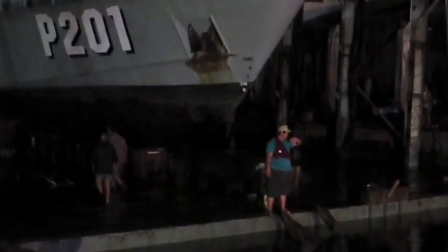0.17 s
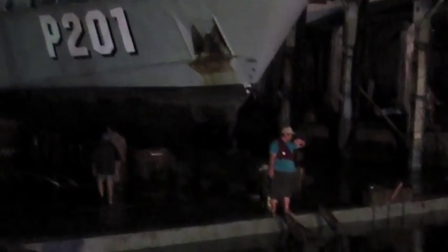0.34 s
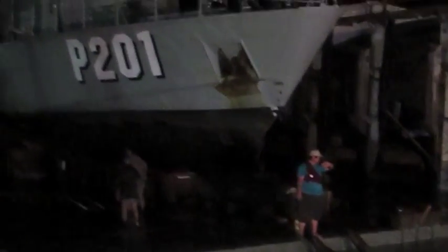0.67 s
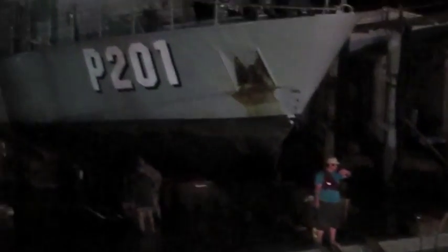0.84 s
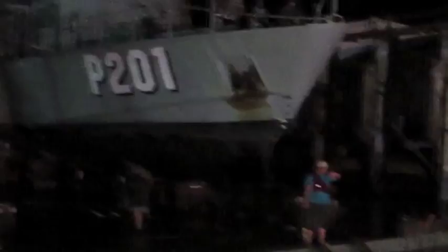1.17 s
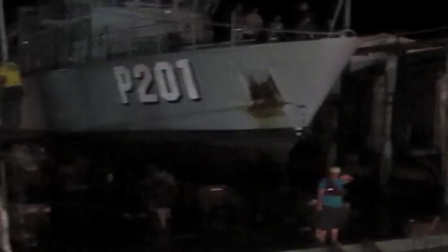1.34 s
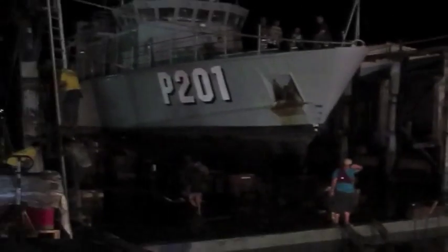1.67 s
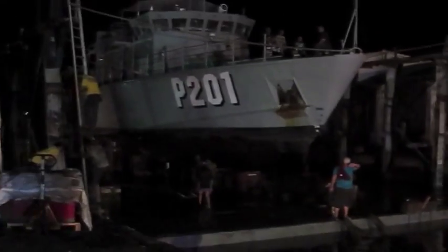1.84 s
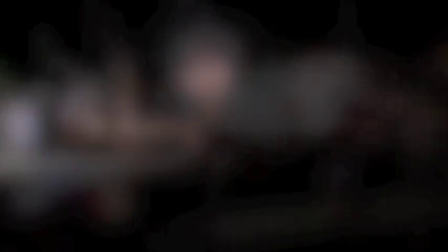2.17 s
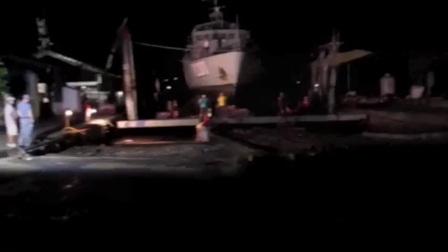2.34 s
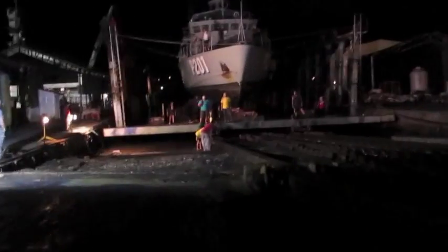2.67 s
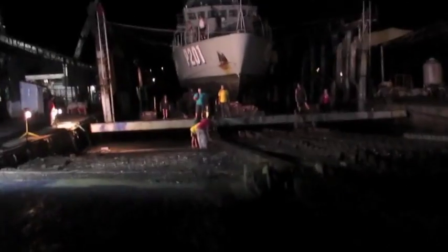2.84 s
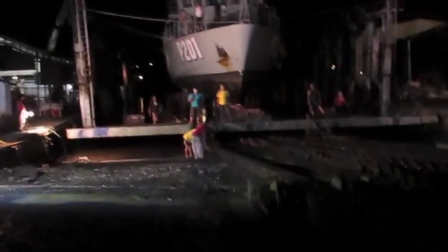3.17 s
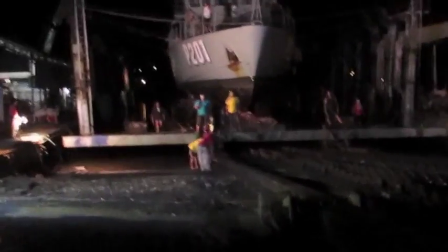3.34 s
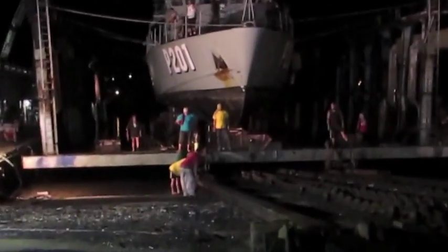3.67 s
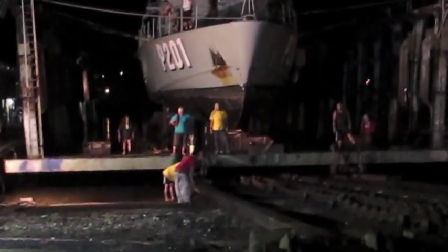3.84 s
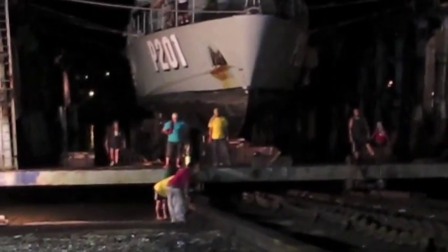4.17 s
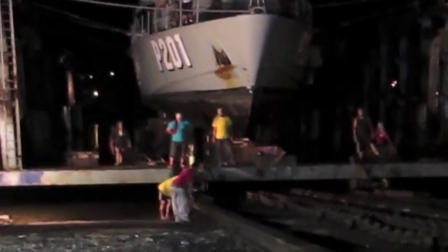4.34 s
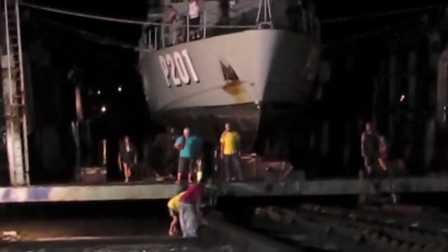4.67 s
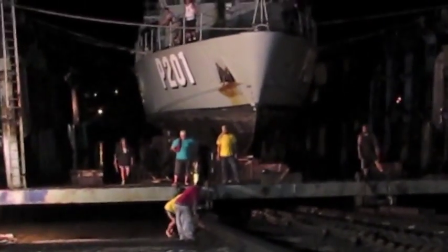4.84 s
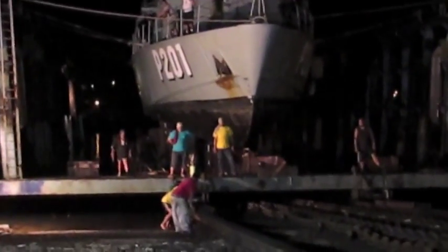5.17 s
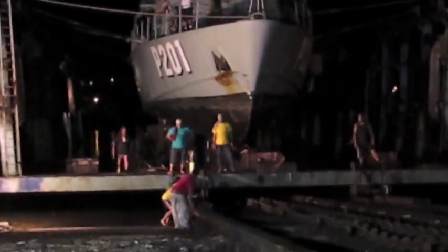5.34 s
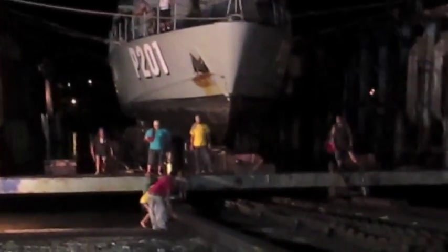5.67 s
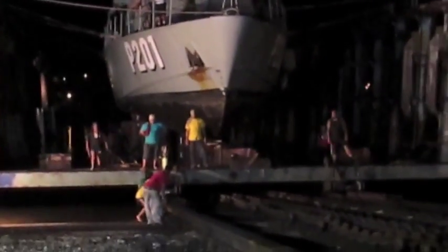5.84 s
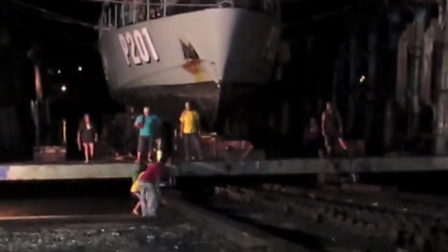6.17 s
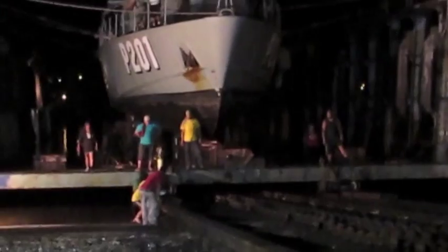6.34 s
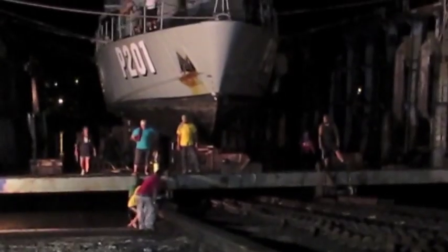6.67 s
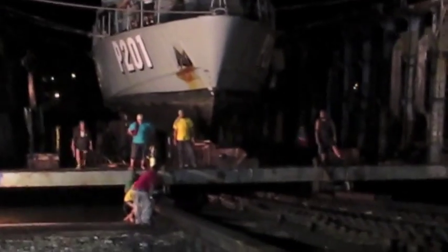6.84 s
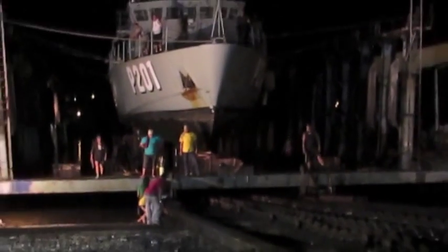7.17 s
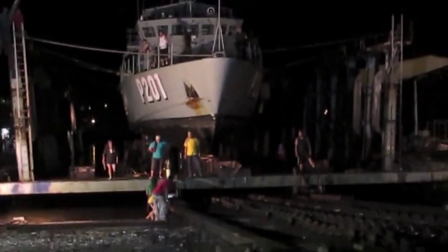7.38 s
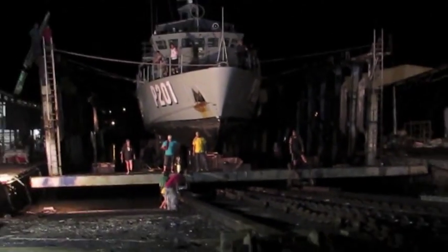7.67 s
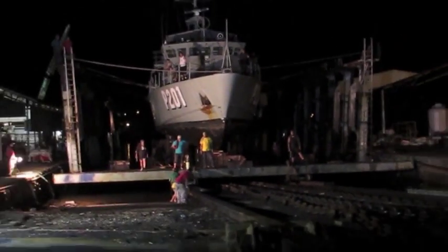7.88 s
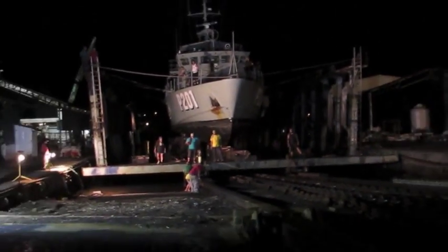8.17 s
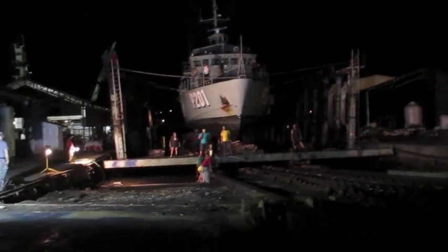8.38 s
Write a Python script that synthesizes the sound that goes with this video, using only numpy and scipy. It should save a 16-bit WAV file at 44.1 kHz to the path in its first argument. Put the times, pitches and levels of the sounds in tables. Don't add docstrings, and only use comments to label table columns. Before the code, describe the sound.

First a distant, windy slipway: low gusts buffeting the microphones, dull yard noise, very faint machine tones and the camera's plastic lever ticking under a finger. The sound dissolves smoothly to a nearby hauling winch, sheltered from wind, whining around a constant pitch above a throbbing hum and rough low rumble, with a thin hiss. One bright, hard click lands early in the close part; the whine gently swells and eases.

```python
import sys
import numpy as np
from scipy import signal
from scipy.fft import rfft, irfft, next_fast_len
from scipy.io import wavfile

SR = 44100
rng = np.random.default_rng(int(sys.argv[2]) if len(sys.argv) > 2 else 0)


def digitize_waveform(pressure):
    field = np.atleast_2d(pressure).T
    bounded = np.clip(field, -1, 1)
    quanta = np.round(bounded * 32767).astype(np.int16)
    wavfile.write(sys.argv[1], SR, quanta)


def voltage_ratio(level):
    return 10 ** (np.asarray(level, float) / 20)


N = 375291
T = np.arange(N) / SR

SHAFT_HZ = 29.905
WHINE_ORDER = 18
DISSOLVE_S, DISSOLVE_LENGTH_S = 2.013, 0.52
RUMBLE_DB, RUSH_DB, FAR_WHINE_DB = -18, -36, -45

# (frequency [Hz], likeness [0-1], left over right [dB], right leads [radians])
PORT_DIFFERENCE = [(60, .9965, 0, .01), (150, .996, 0, .03), (320, .978, -.1, .05), (500, .975, -.5, .08),
                   (1000, .93, -.5, .15), (2100, .78, .3, .3), (2650, .25, 2.2, 1.1), (3100, .5, 3, .8),
                   (3700, .25, 3, 1.3), (5600, .42, 3, 3), (6800, .38, -.3, 4.3), (8000, .3, -8, 5.2),
                   (9000, .25, -14, 4.8), (10500, .15, -13, 4.3), (12000, .06, -10, 4.5),
                   (15000, .04, -10, 4.5)]
# (time [s], level [dB])
YARD_LEVEL = [(0, -29), (.26, -26), (.34, -31.5), (.9, -34.5), (1.05, -33.5), (1.5, -33.5), (1.72, -34.5),
              (1.9, -35.5), (2.1, -33)]
# (frequency [Hz], level [dB per Hz])
YARD_COLOUR = [(150, -9.5), (300, 3), (600, -5.5), (1000, -10.5), (1800, -13), (2500, -20.5), (4000, -25),
               (6000, -25), (8500, -37.5), (10000, -45.5), (13000, -59), (16000, -66)]
# (left port [dB], right port [dB])
BREEZE_DB = (-20, -25.5)
# (time [s], half length [s], left level [dB], right level [dB])
GUSTS = [
    (0.017, 0.069, -47, -28),
    (0.29, 0.081, -19, -31),
    (.66, 0.13, -27, -36),
    (.9, 0.044, -44, -31),
    (1.494, 0.16, -18.5, -20),
    (1.906, 0.1, -35, -20.5),
]
# (frequency [Hz], level [dB per Hz])
WIND_COLOUR = [(12, -36), (20, -11.5), (102, -0.5), (281, -11.5), (454, -22), (507, -25), (549, -37),
               (595, -33), (900, -46), (1170, -75), (1980, -120)]
# (time [s], peak [dB], frequency [Hz], port [0 left, 1 right])
EDDIES = [(.189, -5, 100, 0), (.227, -1.5, 110, 0), (.284, -5, 129, 0), (.328, -4, 100, 0),
          (.664, 0, 104, 0), (0.742, 0.5, 101, 0), (0.911, -6, 110, 1), (1.0, -4.5, 150, 0),
          (1.361, -4, 250, 0), (1.418, -6, 170, 0), (1.46, -6, 150, 1), (1.51, -9, 110, 1),
          (1.541, -1.5, 120, 0), (1.589, -3, 140, 0), (1.627, -2.5, 150, 0), (1.71, -5.5, 110, 1),
          (1.784, -4, 110, 0), (1.816, -8, 110, 1), (1.83, -4.5, 139, 0), (1.942, -1.2, 150, 1)]
# (frequency [Hz], waver
# [radians], close level [dB], far level [dB])
FRAME_TONES = [(25, .5, -50.5, -68.5), (40.5, .5, -52, -72), (56, .5, -50.5, -73), (81.4, .6, -35, -55),
               (99.5, 0.65, -33, -35.5), (161, 0.88, -37.5, -63), (194, 0.57, -39.5, -48),
               (262.2, 1.46, -35.5, -57), (318.8, 1.03, -35, -55), (422.6, 1.34, -32, -60),
               (468.4, 1.65, -32, -61), (811, 2.6, -42, -71), (870, 1.95, -44, -71), (923, 1.56, -60, -74),
               (8853, 2.5, -67, -87)]
CLOSE_DRIVE_DB = {2: -42, 2.5: -48, 4.5: -43, 5: -43, 6: -33, 10: -42, 14: -38, 15: -40, 16: -39, 19: -39,
                  20: -42, 22: -44, 29: -48, 32: -44, 34: -45, 36: -43, 37: -47, 38: -48, 39: -46, 41: -48,
                  53: -45, 54: -45}
FAR_DRIVE_DB = {19: -52, 21: -53, 34: -60, 46: -60, 54: -53}
# (time [s], level [dB])
GEAR_LOAD = [(2.2, -25), (2.5, -21), (2.9, -20), (3.4, -24), (3.6, -23.5), (4.05, -24.5), (4.3, -21),
             (5.1, -19), (5.9, -20.5), (6.2, -21), (6.5, -18.5), (6.8, -22), (7.55, -22.5), (7.8, -19.6),
             (8.15, -19), (8.51, -19.5)]
# (time [s], half length [s], frequency [Hz], level [dB])
BRIEF_TONES = [
    (.21, .05, 765, -38),
    (0.224, .04, 846, -40),
    (2.46, 0.072, 218.5, -22),
    (3.123, 0.14, 660, -26),
]
# (time [s], peak [dB], extra brightness [dB per two octaves], snap [dB])
TICKS = [
    (.731, -26, -26, -12),
    (.8822, -28, -11, -5),
    (.939, -30, -6, -5),
    (.980, -42, -4, 0),
    (1.0629, -9, -1.5, -10),
    (3.7466, -5, 0, -9),
]
# (time [s], half length [s], level [dB])
RUBS = [
    (.766, .008, -46),
    (0.79, .009, -40),
    (1.038, .014, -37),
]
# (frequency [Hz], level [dB per Hz])
SNAP_COLOUR = [(600, -26), (1000, -8), (2300, 9.5), (3300, 0.5), (6500, -1.5), (9500, -27), (14000, -30),
               (16000, -60)]
# (frequency [Hz], left [dB], right [dB], swell [s])
PRESS_TONES = [(1050, -22, -7, .0007), (1550, -20, -13, .0007), (2350, -7, -16, .001),
               (2780, -13, -3, .0007), (3600, -17, -20, .0006), (4150, -17, -10, .0006),
               (5300, -18, -22, .0006), (6300, -16, -7, .0005), (8150, -26, -1, .0004),
               (9300, -28, -11, .0004), (10800, -35, -20, .0003), (14000, -33, -21, .00015)]
# (frequency [Hz], left [dB], right [dB], swell [s])
RELEASE_TONES = [(1820, -17, -18, 0.00045), (2400, -2, -7.5, 0.00046), (2650, -15, 2.5, .00045),
                 (3710, -10, -31, 0.00099), (4920, -14, 0.5, 0.00037), (5760, -16, -7, 0.00051),
                 (6940, -30, -22, 0.00038), (8660, -38, -14, 0.00069), (9800, -38, -20, .0004),
                 (13200, -51, -22, .00025)]
# (frequency [Hz], level [dB per Hz])
RUMBLE_COLOUR = [(15, -68), (25, -38), (54, -20), (87, -17), (124, -10.5), (182, -6), (352, -9.5),
                 (466, -9.5), (494, -11), (536, -10.5), (629, -13.5), (1640, -21), (3000, -33), (3900, -56),
                 (6600, -120)]
# (frequency [Hz], level [dB per Hz])
RUSH_COLOUR = [(1800, -5.5), (2500, -30), (3200, 2), (4500, 2), (5600, 2.5), (6800, -5), (8200, -9.5),
               (9500, -17), (11000, -23), (13000, -32), (14800, -40.5), (16000, -54)]


def rms_one(x):
    return x / np.sqrt(np.mean(x ** 2) + 1e-20)


def in_time(rows):
    seconds, level = np.transpose(rows)
    return np.interp(T, seconds, level)


def at_hz(points, hz):
    table_hz, *columns = np.transpose(points)
    return [np.interp(np.log(hz + 1), np.log(table_hz), column) for column in columns]


def bump(centre, half):
    return np.exp(-((T - centre) / half) ** 2)


def drift(rate):
    r = np.exp(-80 * np.pi * rate / SR)
    noise = rng.standard_normal(N // 40 + 2002)
    slow = signal.lfilter([1], [1, -2 * r, r * r], noise)[2000:]
    return np.interp(np.arange(N) / 40, np.arange(len(slow)), rms_one(slow))


def shaped(x, colour):
    size = next_fast_len(N)
    hz = np.arange(size // 2 + 1) * SR / size
    gain = voltage_ratio(at_hz(colour, hz)[0])
    return rms_one(irfft(rfft(x, size) * gain, size)[..., :N])


def ports(direct, diffuse):
    size = next_fast_len(N)
    alike, pan_db, lead = at_hz(PORT_DIFFERENCE, np.arange(size // 2 + 1) * SR / size)
    alike = np.clip(alike, 0, 1)
    side = np.array([[.5], [-.5]])
    shared = np.sqrt(alike) * rfft(direct, size) * np.exp(-1j * lead * side)
    own = np.sqrt(1 - alike) * rfft(diffuse, size)
    return irfft((shared + own) * voltage_ratio(pan_db * side), size)[:, :N]


def nearness():
    return np.clip((T - DISSOLVE_S) / DISSOLVE_LENGTH_S, 0, 1)


def throb(depth):
    turn = 2 * np.pi * SHAFT_HZ * T
    return 1 + depth * (np.sin(turn) + 0.71 * np.sin(2 * turn))


def machine_noise(colour, patchy_db, throb_depth):
    flicker = voltage_ratio(patchy_db * (drift(36) + 0.4 * drift(0.63)))
    white = rng.standard_normal((3, N)) * throb(throb_depth) * flicker
    return shaped(ports(white[0], white[1:]), colour)


def yard_noise(far):
    return voltage_ratio(in_time(YARD_LEVEL)) * far * machine_noise(YARD_COLOUR, patchy_db=1.37, throb_depth=.03)


def wind(far):
    lumps = np.array([voltage_ratio(1.34 * drift(27)), voltage_ratio(1.6 * drift(31))])
    strength = voltage_ratio(BREEZE_DB)[:, None]
    for s, half, *port_db in GUSTS:
        strength = strength + voltage_ratio(port_db)[:, None] * bump(s, half)
    out = shaped(rng.standard_normal((2, N)) * lumps, WIND_COLOUR) * strength * far ** 1.7

    t = np.arange(-2000, 2000) / SR
    for s, peak_db, hz, port in EDDIES:
        start = round(s * SR) - 2000
        phase = rng.uniform(0, 2 * np.pi)
        push = np.exp(-(hz * t / 0.48) ** 2) * np.cos(2 * np.pi * hz * t + phase)
        out[port, start:start + 4000] += voltage_ratio(peak_db - 1.0) * push
    return out


def frame(close, far):
    out = np.zeros(N)
    for hz, waver, close_db, far_db in FRAME_TONES:
        level = voltage_ratio(close_db) * close + voltage_ratio(far_db) * far
        gain = level * (1 + .25 * drift(2.0))
        out += gain * np.sin(2 * np.pi * hz * T + waver * drift(1.08))
    return np.sqrt(2) * out


def drive(close, far):
    turn = 2 * np.pi * (SHAFT_HZ * T + 0.0089 * drift(0.36))
    whine_db = 20 * np.log10(voltage_ratio(in_time(GEAR_LOAD)) * close + voltage_ratio(FAR_WHINE_DB) * far)
    out = voltage_ratio(whine_db + 0.87 * drift(6.5)) * np.sin(WHINE_ORDER * turn + 0.36 * drift(8.3))
    for tones, place in ((CLOSE_DRIVE_DB, close), (FAR_DRIVE_DB, far)):
        for order, level_db in tones.items():
            gain = voltage_ratio(level_db) * (1 + 0.19 * drift(1.7))
            out += place * gain * np.sin(order * turn + 2 * np.pi * rng.random())
    return np.sqrt(2) * out


def brief_tones():
    out = np.zeros(N)
    for s, half, hz, level_db in BRIEF_TONES:
        out += voltage_ratio(level_db + 3) * bump(s, half) * np.sin(2 * np.pi * hz * T + .3 * drift(4))
    return out


def housing():
    noise = shaped(rng.standard_normal((2, N)), SNAP_COLOUR)
    noise[0] = signal.sosfilt(signal.butter(2, 5500, fs=SR, output="sos"), noise[0])
    out = noise * sum(voltage_ratio(level_db) * bump(s, half) for s, half, level_db in RUBS)

    t = np.arange(int(.03 * SR)) / SR
    snap_shape = t / .0009 * np.exp(1 - t / .0009)
    luck = rng.random((len(TICKS), len(PRESS_TONES), 2))
    for k, (s, peak_db, bright_db, snap_db) in enumerate(TICKS):
        tones = RELEASE_TONES if k == len(TICKS) - 1 else PRESS_TONES
        for port, lag in enumerate((26, 0)):
            start = round(s * SR) + lag
            span = slice(start, start + len(t))
            out[port, span] += voltage_ratio(peak_db + snap_db) * noise[port, span] * snap_shape
            for m, (hz, *port_db, swell) in enumerate(tones):
                shape = t / swell * np.exp(1 - t / swell)
                shape += .07 * (1 - np.exp(-t / swell)) * np.exp(-t / (5 * swell))
                octaves_up = max(np.log2(hz / 2650), 0)
                gain = voltage_ratio(peak_db + port_db[port] + bright_db * octaves_up / 2)
                cycles = hz * (t + lag / SR) + m / 2 + .15 * luck[k, m, port]
                out[port, span] += gain * shape * np.sin(2 * np.pi * cycles)
    return signal.sosfilt(signal.butter(4, 14500, fs=SR, output="sos"), out)


def steel_rumble(close):
    return voltage_ratio(RUMBLE_DB) * close * machine_noise(RUMBLE_COLOUR, patchy_db=-0.41, throb_depth=0.042)


def cooling_air(close):
    return voltage_ratio(RUSH_DB) * close * machine_noise(RUSH_COLOUR, patchy_db=-0.2, throb_depth=0.036)


def scene():
    close = nearness()
    far = 1 - close
    tones = frame(close, far) + drive(close, far) + brief_tones()
    balance = voltage_ratio(np.array([[-.4], [.4]]))
    machine = ports(tones, np.zeros((2, N))) * balance + steel_rumble(close) + cooling_air(close)
    return yard_noise(far) + wind(far) + machine + housing()


def band_limit(x):
    return signal.sosfilt(signal.butter(12, 15700, fs=SR, output="sos"), x)


def record(dry):
    duck_db = np.zeros(N)
    for (s, *_), depth_db in zip(TICKS[-2:], (3.5, 6)):
        since = T - s - .003
        duck_db += np.clip(since / 0.01, 0, 1) * np.maximum(depth_db - 21 * since, 0)
    return band_limit(np.clip(dry * voltage_ratio(-duck_db), -.99, .99))


dry = scene()
out = record(dry)
digitize_waveform(out)
```